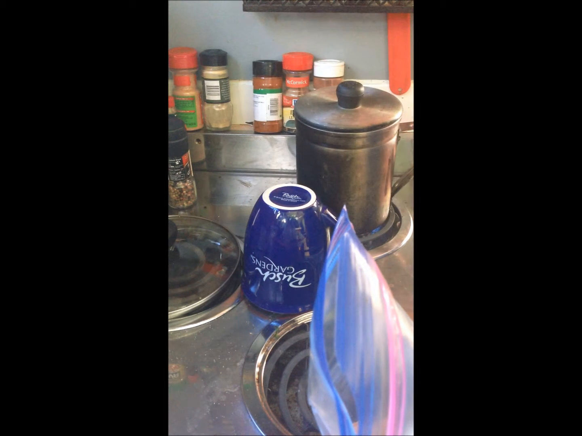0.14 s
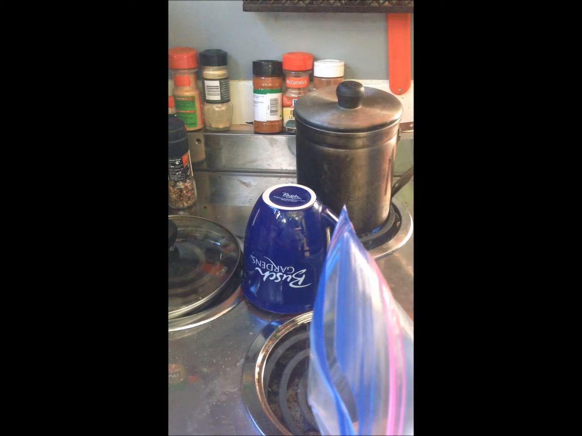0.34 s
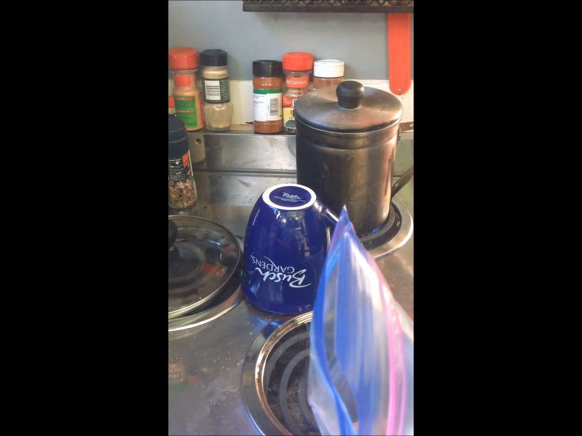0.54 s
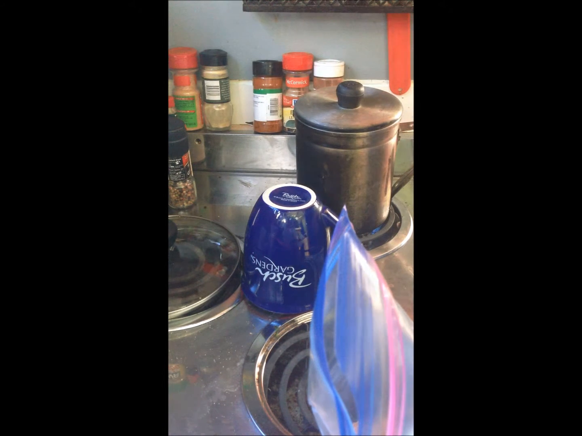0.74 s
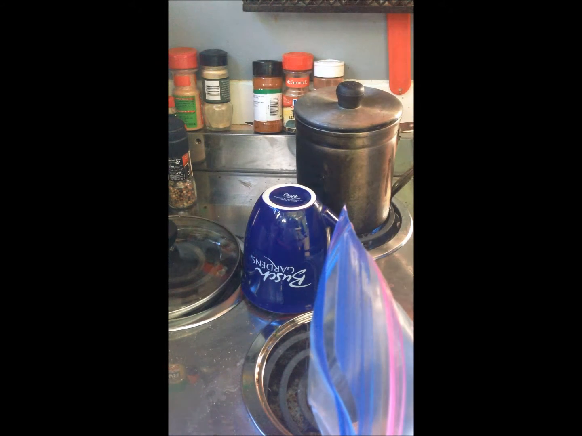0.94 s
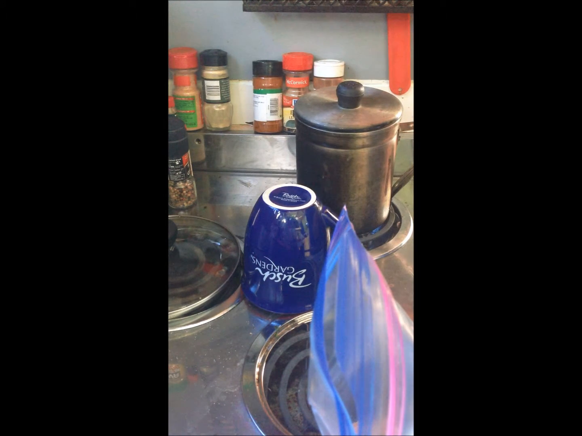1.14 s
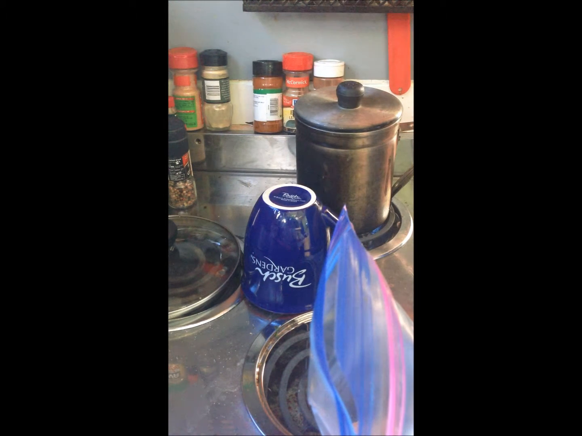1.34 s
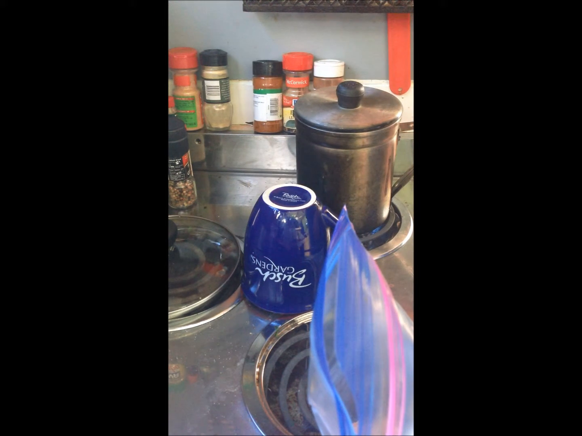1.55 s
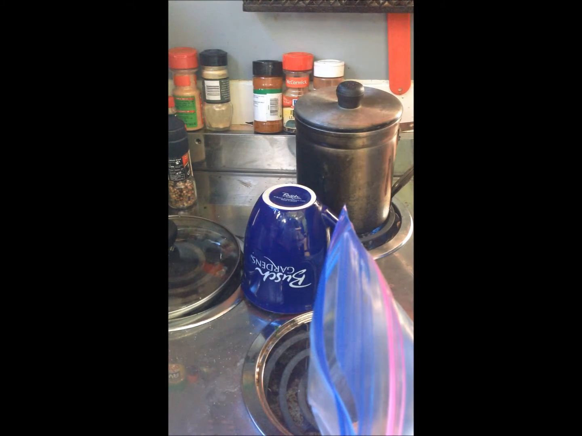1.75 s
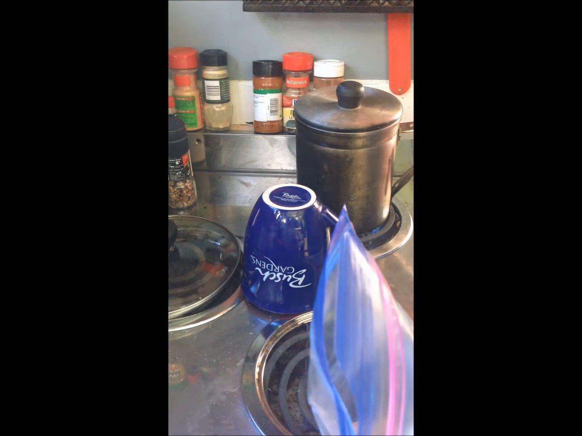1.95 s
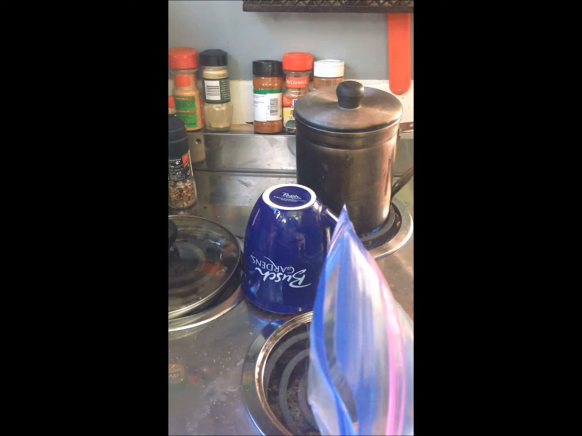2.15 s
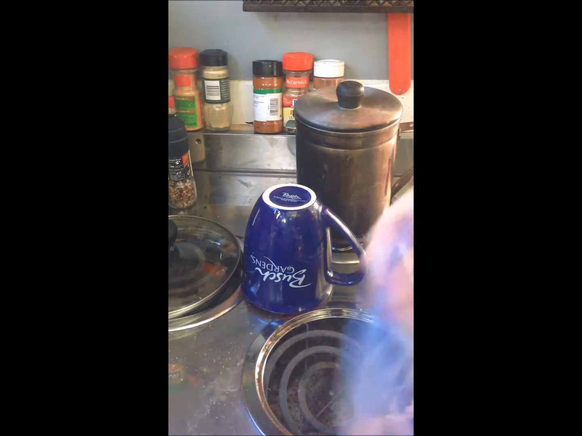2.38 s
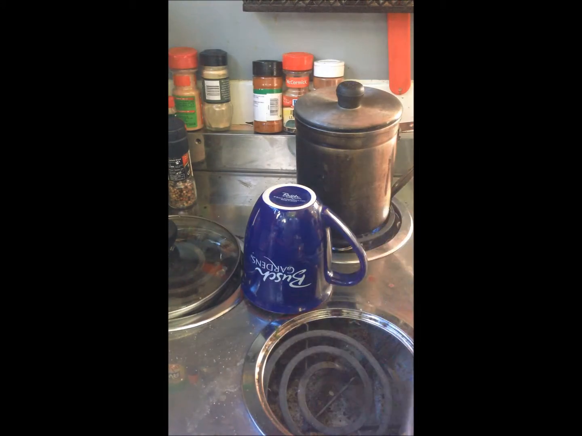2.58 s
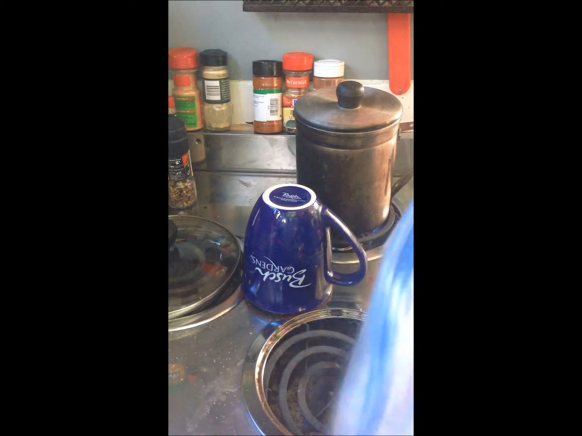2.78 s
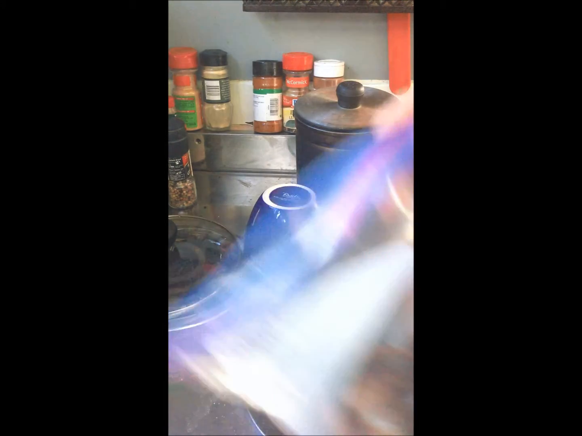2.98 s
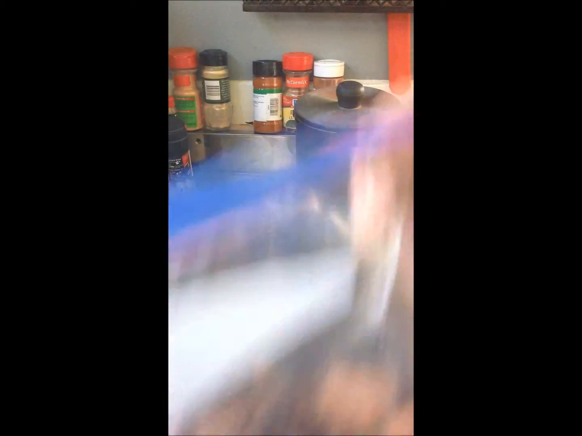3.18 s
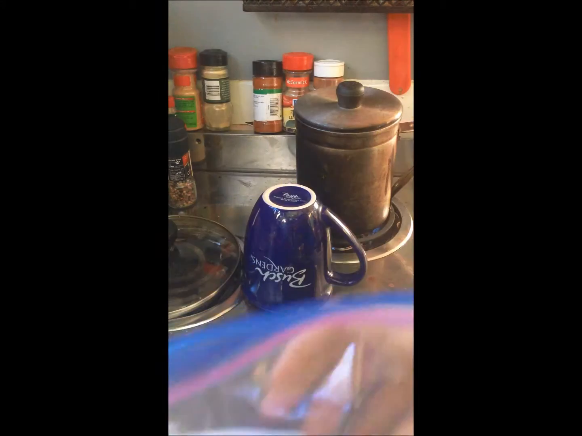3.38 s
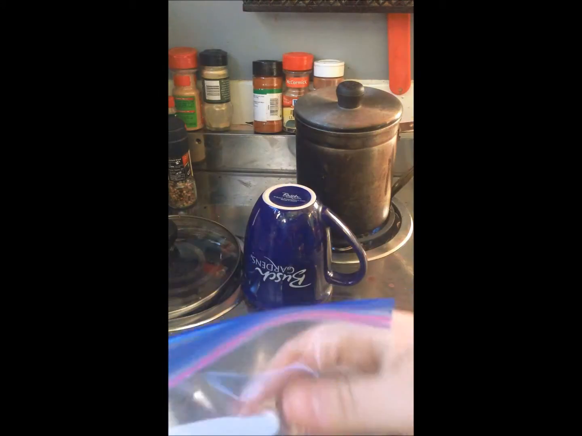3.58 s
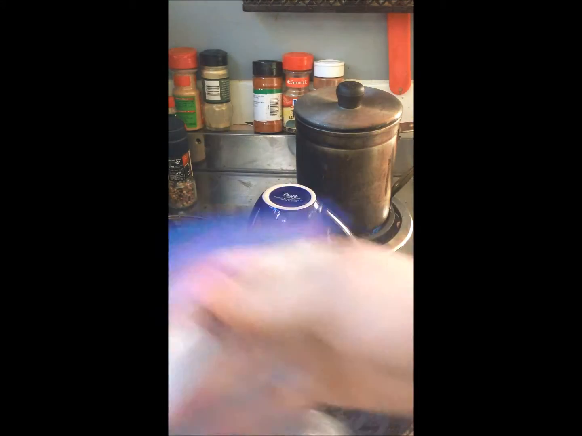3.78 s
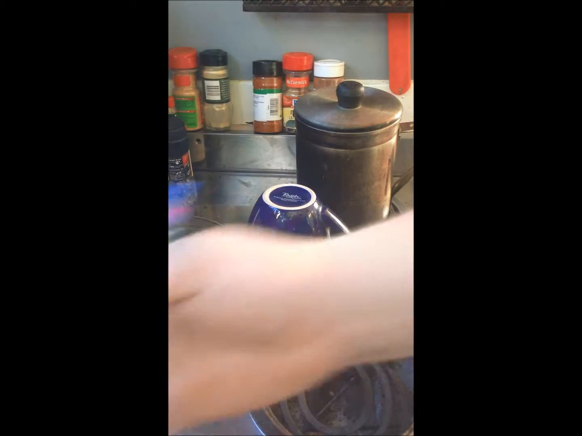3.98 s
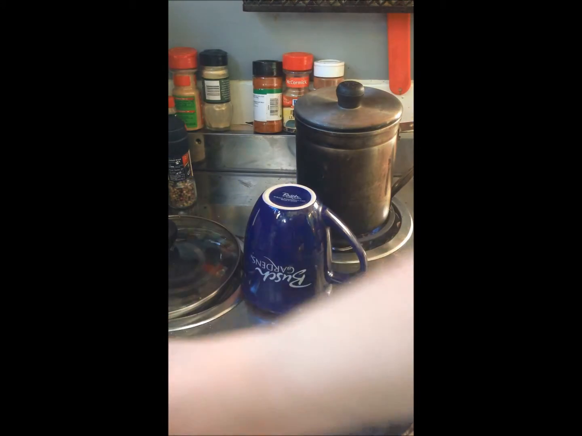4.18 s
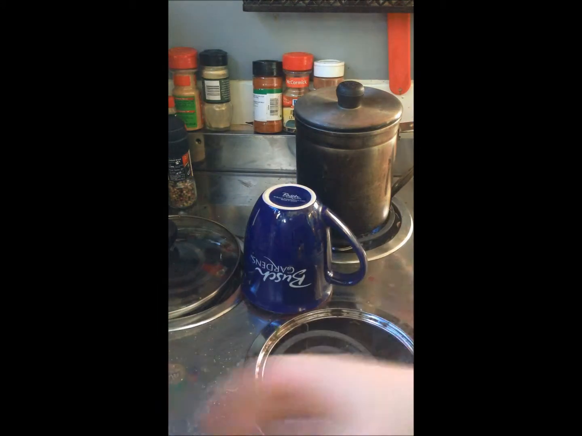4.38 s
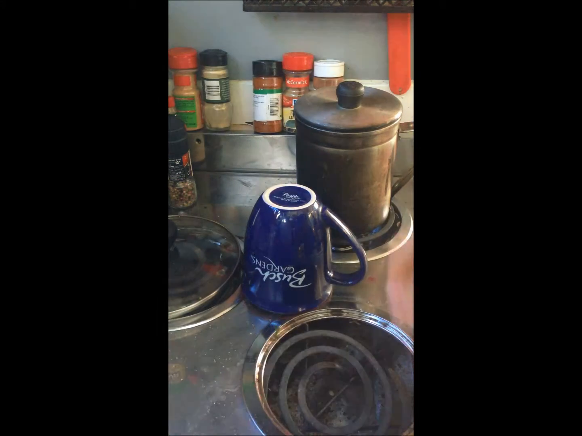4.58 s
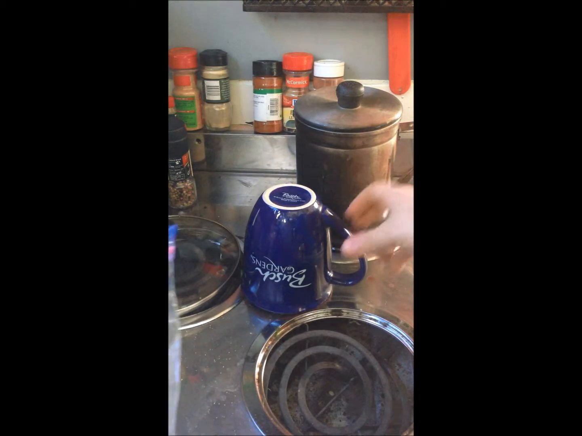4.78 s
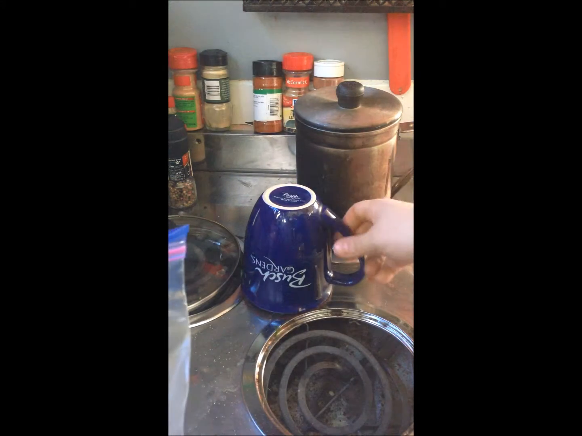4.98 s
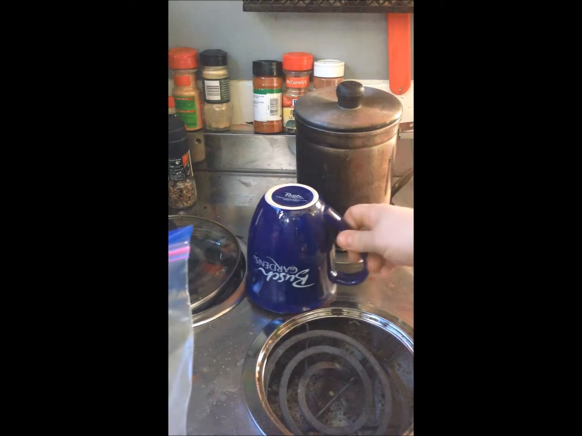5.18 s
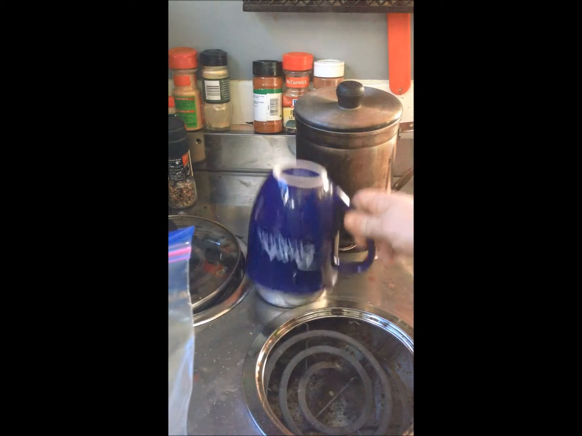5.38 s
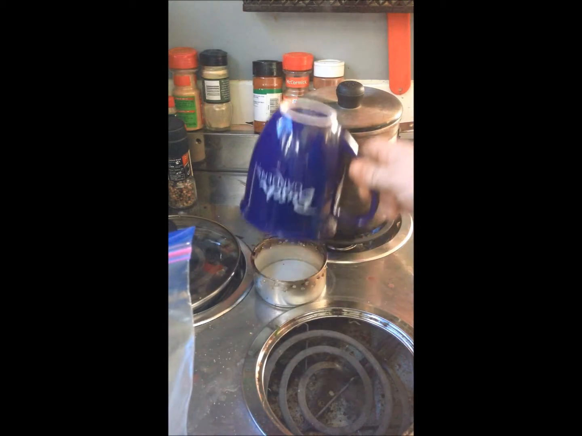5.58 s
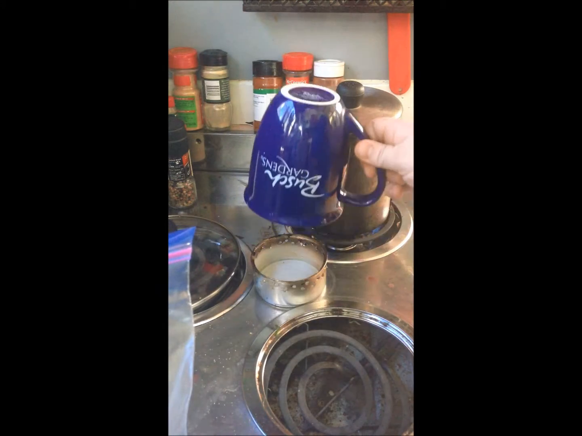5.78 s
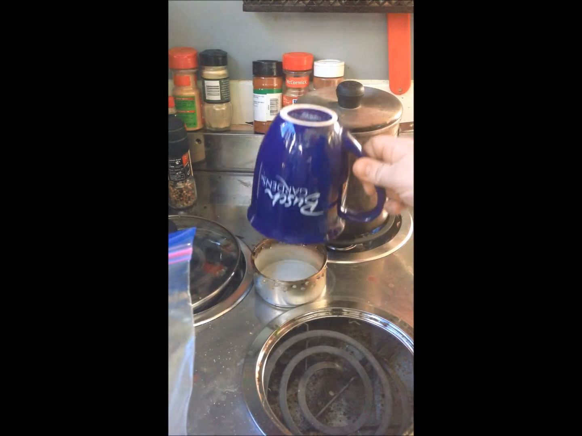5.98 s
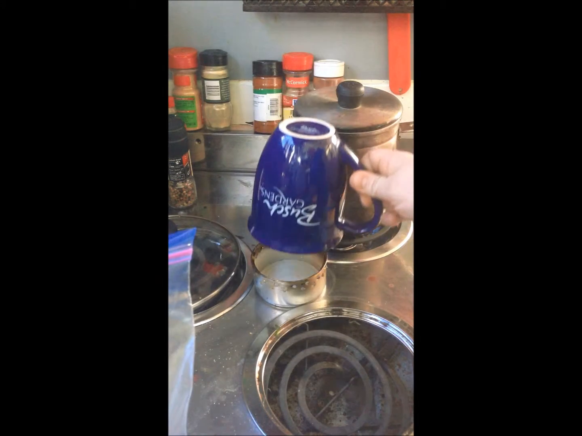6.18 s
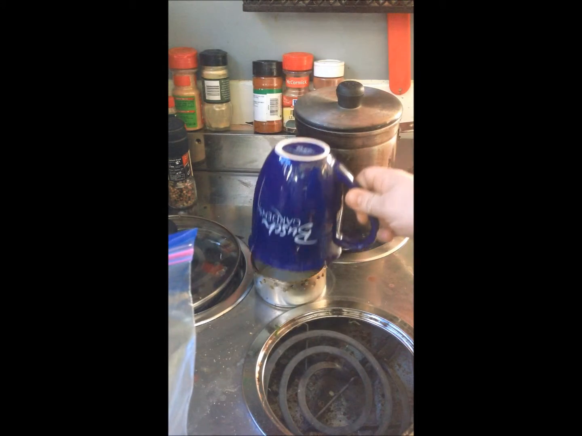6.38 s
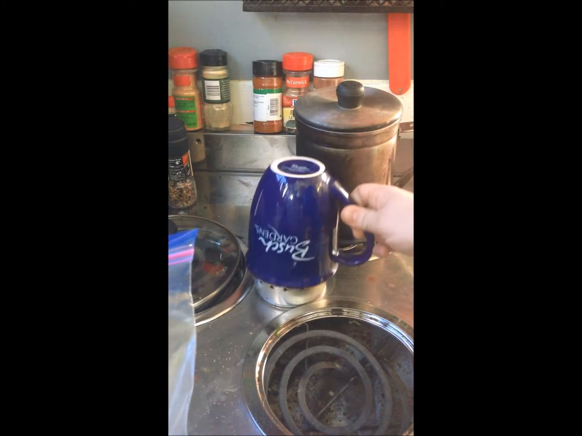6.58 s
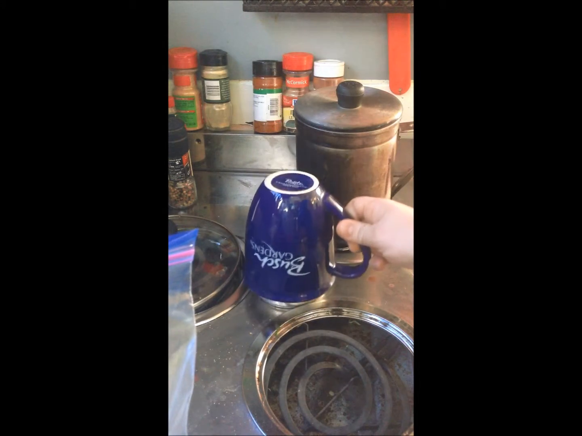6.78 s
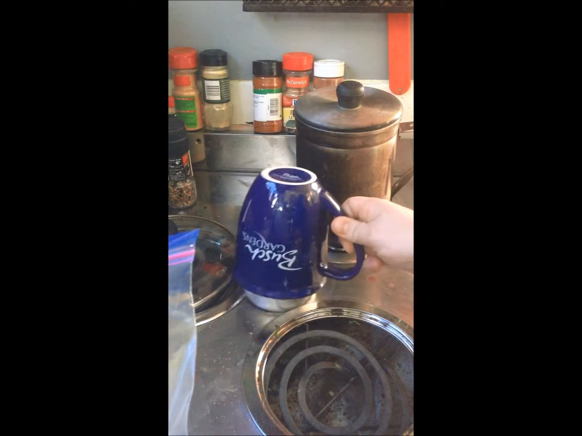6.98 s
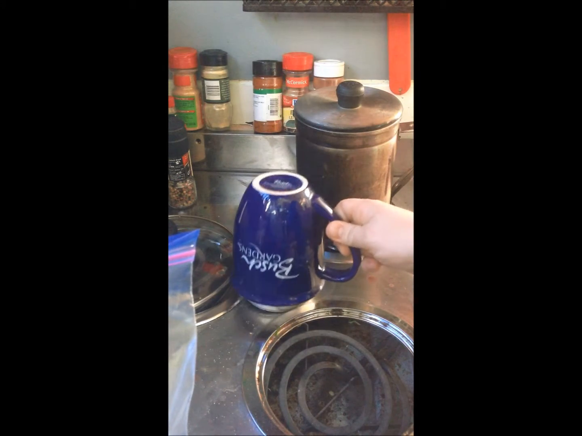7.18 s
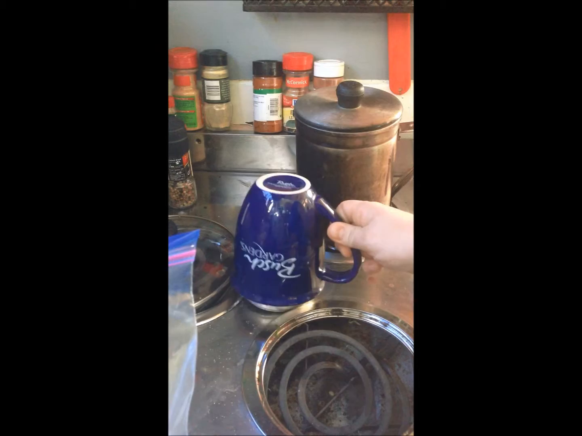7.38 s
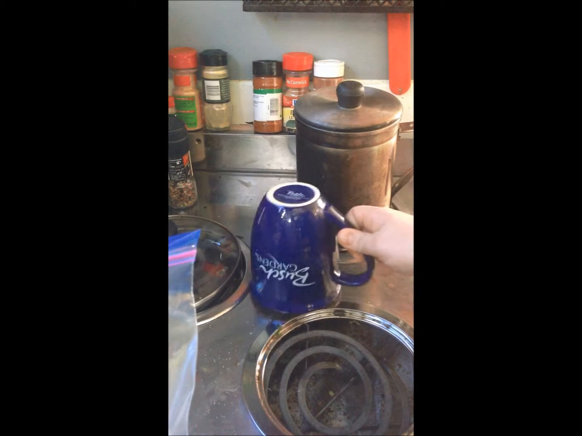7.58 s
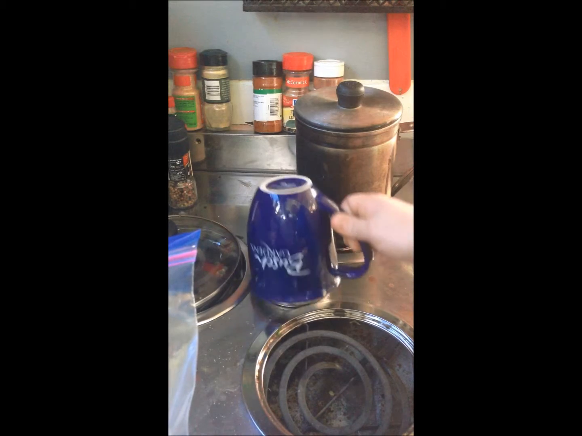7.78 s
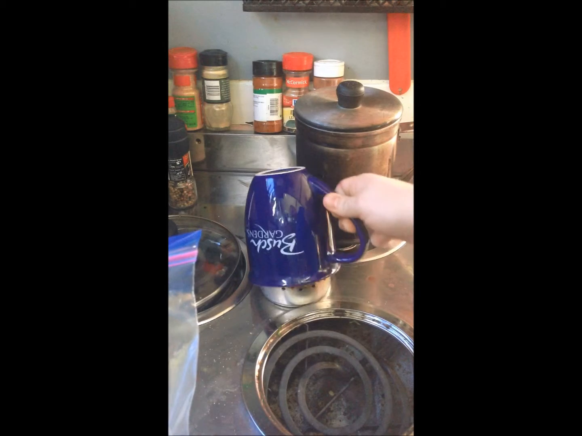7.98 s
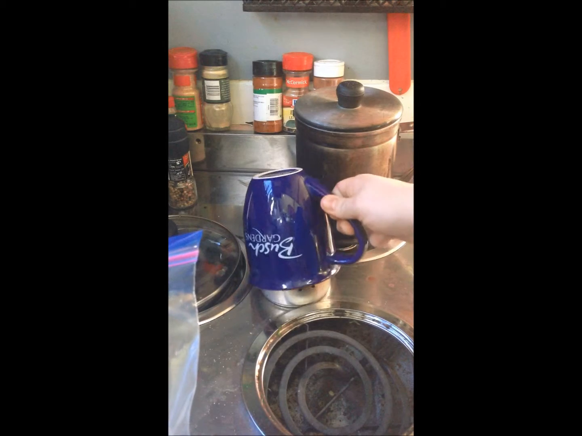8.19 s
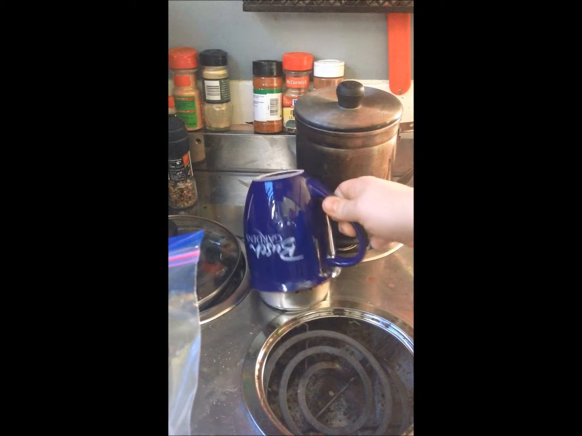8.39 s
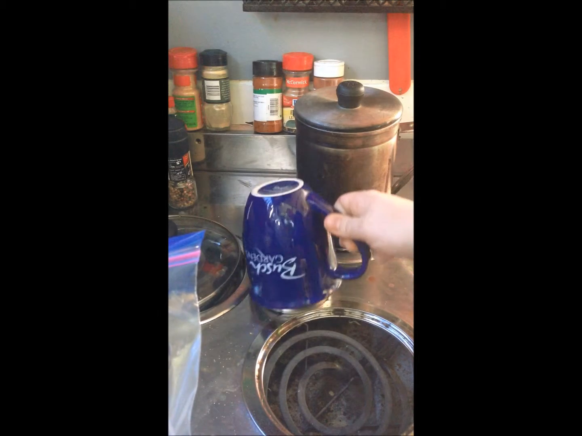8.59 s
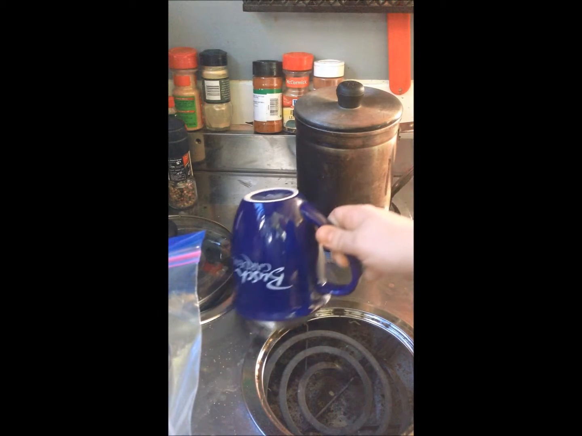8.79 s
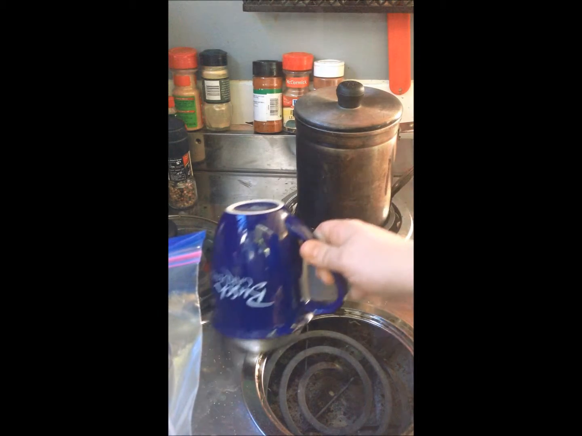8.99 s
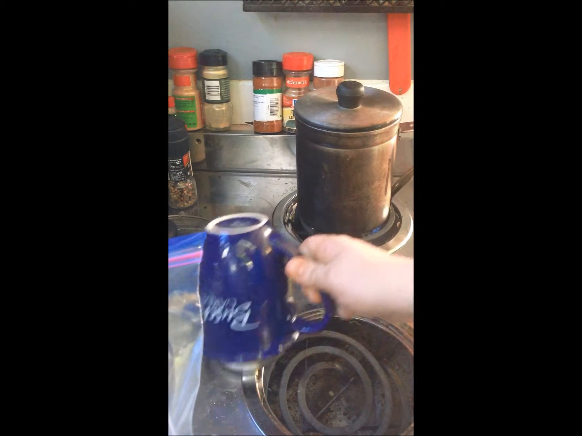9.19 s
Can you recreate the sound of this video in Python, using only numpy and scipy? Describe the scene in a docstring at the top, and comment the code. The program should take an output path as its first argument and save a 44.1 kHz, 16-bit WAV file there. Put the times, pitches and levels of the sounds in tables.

```python
"""A kitchen, at the stove. After three soft, distant knocks, a plastic zip bag is lifted and laid aside,
its film buckling in snaps and puffs. Then an upturned ceramic mug is raised from a small metal cup,
lowered, knocked onto the stove top and nudged about. The sheet metal clacks, the air under the mug rings
hollow, and the glaze squeals briefly on the cup. A faint hiss and a low room tone run throughout."""
import sys
import numpy as np
from scipy import signal
from scipy.fft import rfft, irfft
from scipy.io import wavfile

SR = 44100
rng = np.random.default_rng(int(sys.argv[2]) if len(sys.argv) > 2 else 0)


def unload_audio(sound):
    """Save the sound as a 16-bit wav file, at the path given as the first command line argument."""
    columns = np.transpose(np.atleast_2d(sound))
    # keep every value between -1 and 1, then stretch to whole-number steps
    steps = np.round(np.clip(columns, -1, 1) * 32767)
    wavfile.write(sys.argv[1], SR, steps.astype(np.int16))


N = 407925

# knocks at the stove, three soft, distant ones first, then the mug's hits:
# start_s, clack_db, hardness_db_per_octave, hollow_db, tick_db, contact_s
KNOCK_CUES = [(1.496, -42.5, -2, -66, -49, 0.004), (1.519, -39.5, -5, -51, -46, 0.011),
              (2.137, -45.5, -6, -60, -51, 0.0023), (5.219, -34, -5.5, -31, -40.5, 0.038),
              (5.5142, -18, 1.5, -32.5, -20.5, 0.0097), (6.577, -21.5, -2.4, -23.5, -31, 0.0074),
              (6.824, -42, -4.5, -43, -45.5, 0.015), (6.866, -44.5, -5, -48, -63, 0.0061),
              (6.993, -50, -9, -48, -53, 0.02), (7.2846, -24, -1, -29, -40.5, 0.0035),
              (7.517, -31, -5.5, -37, -38.5, 0.0061), (7.541, -29.5, -6, -23, -34, 0.088),
              (7.5868, -17.5, -4.4, -19, -19, .0068), (7.595, -16.5, -0.8, -24, -18.5, 0.0091),
              (7.627, -34, 1, -38, -33.5, 0.0052), (7.666, -31, -5.5, -28, -45.5, 0.0097),
              (7.739, -43, -7, -44, -50, 0.003), (7.82, -40.5, -6.5, -34, -52, 0.0067),
              (7.969, -42, -3, -37, -56, 0.0063), (8.34, -37.5, -4, -38, -40.5, 0.024),
              (8.382, -42, -6, -43, -53, 0.0093), (8.623, -48.5, -3, -38, -52, 0.011),
              (9.215, -29.5, -3.5, -30.5, -36.5, 0.009)]
# body of a knock, voiced as mug and stove top together: pitch_hz, level_db, base_t60_s
BODY_MODES = [(493, 0, 0.18), (703, -2.5, 0.14), (864, 1, 0.096), (1678, 1.5, 0.086), (2010, 3.5, 0.095),
              (2170, -10, 0.12), (2400, -1, 0.1), (2545, 11.5, 0.023), (3156, 1, 0.056), (3300, -10, 0.043),
              (3700, 3.5, 0.06), (4690, 10.5, 0.056)]
# hollow ring of a knock: air_pitch_ratio, level_db, base_t60_s
HOLLOW_MODES = [(0.802, -3, 0.089), (0.998, 4, 0.13), (1.15, -2, .13)]
# air under the mug, higher as the rim lifts and lower as it closes on the stove: time_s, pitch_hz
AIR_PITCH = [(5.3, 347.6), (5.5, 433.4), (6.58, 499), (6.85, 441), (7.54, 423), (7.6, 367), (7.67, 343),
             (7.97, 430), (8.34, 363), (8.7, 379), (8.95, 403.7), (9.12, 371), (9.22, 405)]
# decay of a knock's chatter: freq_hz, base_t60_s
CHATTER_DECAY = [(100, 0.48), (260, 0.27), (700, 0.19), (1800, 0.17), (5000, 0.11), (13000, 0.088)]
# a knock's low thud, top tick and sheet-metal clack: freq_hz, gain_db
THUD_EQ = [(25, -29), (60, -11.5), (120, -5.5), (260, -2.5), (400, -4)]
KNOCK_TICK_EQ = [(3500, -8.5), (5200, -1.5), (7500, -1.5), (10000, -7.5), (15000, -15)]
PLATE_EQ = [(400, -12.5), (560, 0.5), (900, -2), (1250, 4), (1800, 0.5), (4600, -0.5), (6200, -13)]
# light touches of glaze on metal: start_s, level_db
CLINK_CUES = [(5.212, -29), (5.503, -40), (7.569, -24), (7.576, -27.5)]
# their bright ring: pitch_hz, level_db, t60_s
CLINK_RING = [(4590, 6, 0.029), (4870, -17, 0.01), (7050, -5, .02)]
# the rim rubbing along: start_s, length_s, level_db
RUB_CUES = [(5.249, 0.14, -47), (5.4, 0.073, -46.5), (5.453, .08, -39), (6.939, 0.061, -50),
            (6.987, 0.044, -49), (7.223, 0.063, -49), (8.396, 0.13, -54.5), (8.701, 0.4, -49),
            (8.803, 0.072, -43), (8.888, 0.093, -43.5), (9.101, 0.063, -46.5)]
# grit on a rub: freq_hz, gain_db
GRIT_EQ = [(150, 1.5), (600, 5.5), (1200, -6.5), (2400, -3.5), (12000, -21.5)]
# glaze dragging off the cup: start_s, length_s, level_db
SQUEAL_CUES = [(7.522, .042, -34), (7.564, .02, -34)]
# high modes of the squeal: pitch_hz, level_db
SQUEAL_TONES = [(6720, -9), (8130, -9), (9420, -11), (10950, -8)]

# the bag's film buckling: start_s, snap_db, length_s
BUCKLE_CUES = [(2.4455, -41, 0.0013), (2.462, -37, 0.0064), (2.478, -32, 0.0039), (2.572, -44.5, 0.0012),
               (2.615, -38, 0.0023), (2.819, -34, 0.0034), (2.849, -43.5, 0.0069), (2.985, -44, 0.0037),
               (3.065, -47, 0.0014), (3.317, -35.5, 0.007), (3.327, -30.5, 0.019), (3.3308, -30, 0.0016),
               (3.3482, -22.5, 0.0042), (3.417, -42.5, 0.0011), (3.6661, -46, 0.00076),
               (3.7244, -41.5, 0.00056), (3.809, -39, 0.0039), (3.843, -39.5, 0.0044), (3.866, -41, .007),
               (3.877, -41, 0.0023), (4.081, -46.5, 0.0028), (4.145, -33, 0.011)]
# the film's mid snap, high fizz and low puff: freq_hz, gain_db
SNAP_EQ = [(400, -18), (800, -7), (1400, -6), (2200, 2.5), (3200, -3), (4700, -1), (7000, -30)]
FIZZ_EQ = [(3500, -27.5), (5200, 3.5), (7500, -0.5), (10000, -5), (15000, -16)]
PUFF_EQ = [(30, -20), (90, -7.5), (170, 2.5), (300, -4), (480, -4.5), (850, -1), (1300, -4.5)]
# moves of the hand carrying the bag: crest_s, level_db, half_width_s
HAND_MOVES = [(2.46, -39, 0.062), (2.87, -48.5, 0.11), (3.15, -57, 0.12), (3.62, -51, 0.43),
              (4.17, -43, 0.039), (4.32, -56.5, 0.13)]
# slack film flopping over: start_s, level_db
FLOP_CUES = [(2.412, -42), (2.467, -50), (2.849, -48), (3.101, -51), (3.351, -33.5), (3.484, -51),
             (3.703, -48), (3.746, -40.5), (3.802, -35), (3.869, -39.5), (3.975, -44.5), (4.009, -49.5),
             (4.082, -46), (4.149, -36)]
# fine, thin ticks, from film creases and grit under the sliding rim: start_s, peak_db
FINE_TICK_CUES = [(0.0972, -29), (0.168, -20.5), (0.3616, -30.5), (1.039, -27.5), (1.3109, -29),
                  (1.6157, -25.5), (1.7818, -33), (2.4458, -20), (2.615, -21), (3.7238, -27), (5.4106, -32),
                  (5.4655, -30), (5.7404, -32), (6.5006, -37), (7.3693, -31)]
# their tone: freq_hz, gain_db
FINE_TICK_EQ = [(6000, -4), (8500, -5), (15000, -7)]

# fader ride on the hiss's airy top: time_s, level_db
HISS_RIDE = [(0.0, -47.5), (2.55, -48.5), (3.19, -53.5), (3.68, -50), (3.89, -52), (8.27, -56.5),
             (9.25, -46.5)]
# body and airy top of the hiss: freq_hz, gain_db
HISS_BODY_EQ = [(500, -24), (950, -15), (1350, -4), (2000, -3), (2500, -0.5), (2900, -4), (3600, -0.5),
                (4700, -1), (6500, -30)]
HISS_TOP_EQ = [(3000, -15), (5300, 2), (6800, 0.5), (8500, 0.5), (11000, -4.5), (15000, -7)]
# resonances colouring the hiss: centre_hz, width_hz, gain_db
HISS_RESONANCES = [(1685, 100, 6), (2410, 240, 5.5), (3680, 190, 2), (4660, 400, 2), (6500, 300, 3.5)]
# breathy whistle in the hiss: pitch_hz, width_hz, level_db
WHISTLE_BANDS = [(715, 70, -18.5), (1358, 170, -2), (1650, 100, -0.5), (2390, 240, -11), (3830, 410, -4),
                 (4650, 330, 1), (5590, 150, 2), (6570, 600, -12), (8070, 610, -1)]
# low room tone: freq_hz, gain_db
ROOM_EQ = [(30, -21), (70, -3.5), (125, -11), (170, -10), (350, -11), (600, -10.5), (1200, -12)]
# faint drones that come and go: start_s, end_s, pitch_hz, width_hz, level_db
DRONE_CUES = [(0, 1.6, 54, 12, -67), (5.5, 6.55, 605, 50, -65), (5, 5.25, 355, 60, -64)]
# the kitchen's reverb: freq_hz, t60_s
ROOM_DECAY = [(100, 0.94), (400, 0.77), (1500, 0.16), (4000, 0.19), (12000, 0.59)]

CONTACT_S, RING_SCALE, RING_GROWTH = 0.0096, 0.83, 0.29  # firm, brief contact damps; loose contact rings
THUD_DB, THUD_PER_HARDNESS = -13.5, -2  # against the clack; soft blows thud more
FADE_SHARE = 0.65  # share of a rub or squeal spent swelling and dying
FOLD_S = 0.0043  # a middling fold; longer ones push more air and fizz less
PUFF_DB, PUFF_DB_PER_DOUBLING = -6, 3  # against the snap
FIZZ_DB, FIZZ_DB_PER_DOUBLING = -5.5, -1.5
FLOP_RISE_S, FLOP_CUTOFF_HZ = 0.0057, 348
HISS_USUAL_DB = -51  # body and whistle follow the ride's swings about this level
BODY_DB, BODY_FOLLOWS = -52, 0.21
WHISTLE_DB, WHISTLE_FOLLOWS = -59, 1.2
LOWPASS_HZ = 15600


def knocks():
    """Three soft, distant knocks, then the mug's hits: each chatters on contact, then rings out."""
    out, t = np.zeros(N), np.arange(SR // 2) / SR
    mode_peaks = [(hz, 65, 8.5) for hz, _, _ in BODY_MODES]  # the chatter gathers at the modes
    sheet_eq = lambda hz: band(PLATE_EQ)(hz) + bells(hz, mode_peaks)
    for start, clack_db, hardness, hollow_db, tick_db, contact in KNOCK_CUES:
        stretch = RING_SCALE * (contact / CONTACT_S) ** RING_GROWTH
        attack = np.minimum(t / (0.17 * contact), 1)
        swell = np.minimum(t / (0.64 * contact), 1)  # low modes take longer to build up
        decay = [(hz, t60 * stretch) for hz, t60 in CHATTER_DECAY]
        chatter = attack * dying_noise(t, decay, hold_s=contact)
        # each point of contact favours other modes
        modes = [(hz, db + 3 * rng.normal(), t60 * stretch) for hz, db, t60 in BODY_MODES]
        body = attack * ring(t, modes, hold_s=contact / 2)
        air_modes = [(ratio * air_pitch(start), db, t60 * stretch) for ratio, db, t60 in HOLLOW_MODES]
        hollow = swell * ring(t, air_modes, hold_s=contact)
        clack = unit(eq(chatter, sheet_eq)) + amp(-2.5) * unit(body)
        # harder blows are brighter
        clack = eq(clack, lambda hz: hardness * np.log2(np.clip(hz, 500, 5000) / 1500))
        thud = burst(eq(chatter, band(THUD_EQ)), clack_db + THUD_DB + THUD_PER_HARDNESS * hardness)
        tick = burst(eq(chatter, band(KNOCK_TICK_EQ)), tick_db)
        add(out, start, burst(clack, clack_db) + burst(hollow, hollow_db) + thud + tick)
    return out


def glaze_clinks():
    """Glaze touches metal with a short, bright ring."""
    out, t = np.zeros(N), np.arange(SR // 2) / SR
    attack = np.minimum(t / 0.00043, 1)
    for start, db in CLINK_CUES:
        add(out, start, amp(db) * attack * ring(t, CLINK_RING))
    return out


def rim_rubs():
    """The rubbing rim keeps the air under the mug humming, with a little grit on top."""
    out = np.zeros(N)
    for start, length, db in RUB_CUES:
        t = np.arange(start, start + length, 1 / SR)
        hum = signal.hilbert(narrow_noise(air_pitch(t), width_hz=81, size=len(t)))
        hum = unit(hum.real / (abs(hum) + 2.9))  # steady rubbing evens out the swells
        grit = unit(eq(rng.standard_normal(len(t)), band(GRIT_EQ)))
        add(out, start, amp(db) * (hum + amp(-5) * grit) * signal.windows.tukey(len(t), FADE_SHARE))
    return out


def air_pitch(time_s):
    """Resonance of the air under the mug, in Hz."""
    return np.interp(time_s, *np.transpose(AIR_PITCH))


def glaze_squeals():
    """Stick and slip of the glaze on the cup's edge drives a few high modes."""
    out = np.zeros(N)
    for start, length, db in SQUEAL_CUES:
        size = round(length * SR)
        tones = sum(amp(level) * narrow_noise(hz, width_hz=260, size=size) for hz, level in SQUEAL_TONES)
        add(out, start, amp(db) * unit(tones) * signal.windows.tukey(size, FADE_SHARE))
    return out


def bag_buckles():
    """Each buckle of the film is a cluster of tiny snaps and a low puff of air."""
    out, t = np.zeros(N), np.arange(SR // 5) / SR
    for start, db, length in BUCKLE_CUES:
        cluster = crackle(t, length)
        doublings = np.log2(length / FOLD_S)
        crack = early_echoes(cluster, wet_db=-2, t60=0.096)
        push = early_echoes(cluster, wet_db=-3.5, t60=0.14)
        fold_hz = 2000 * 2 ** rng.normal()  # each fold has its own pitch
        fold_eq = lambda hz: band(SNAP_EQ)(hz) + bells(hz, [(fold_hz, fold_hz / 2, 5)])
        snap = burst(eq(crack, fold_eq), db)
        fizz = burst(eq(crack, band(FIZZ_EQ)), db + FIZZ_DB + FIZZ_DB_PER_DOUBLING * doublings)
        puff = burst(eq(push, band(PUFF_EQ)), db + PUFF_DB + PUFF_DB_PER_DOUBLING * doublings)
        add(out, start, snap + fizz + puff)
    return out


def bag_flops():
    """Slack film flops over with a low, rounded bump."""
    out, t = np.zeros(N), np.arange(SR // 5) / SR
    for start, db in FLOP_CUES:
        push = rng.standard_normal(len(t)) * t * np.exp(-(t / FLOP_RISE_S) ** 2 / 2)
        bump = eq(early_echoes(push, wet_db=-11, t60=0.18), slack_eq)
        add(out, start, burst(bump, db))
    return out


def bag_crinkle(ticks_per_s=300, pops_per_s=22):
    """Small creases tick and slack film pops softly, swelling with each move of the hand."""
    t = np.arange(N) / SR
    swell = sum(amp(db) * np.exp(-((t - crest) / width) ** 2) for crest, db, width in HAND_MOVES)
    ticks = (rng.random(N) < ticks_per_s / SR) * rng.choice([-1, 1], N)
    ticks = early_echoes(ticks * uneven_gains(N, spread_db=6.3, cap=2.5), wet_db=2, t60=0.064)
    pops = (rng.random(N) < pops_per_s / SR) * rng.uniform(0.3, 1, N)
    pops = early_echoes(pops, wet_db=3.5, t60=0.16)
    snap = amp(-1) * unit(eq(ticks, band(SNAP_EQ)))
    fizz = amp(-7) * unit(eq(ticks, band(FIZZ_EQ)))
    flutter = amp(-2) * unit(eq(pops, slack_eq))
    return swell * (snap + fizz + flutter)


def slack_eq(hz):
    """Tone of slack film in dB: a puff with its top rolled off."""
    return band(PUFF_EQ)(hz) - 10 * np.log10(1 + (hz / FLOP_CUTOFF_HZ) ** 4)


def fine_ticks():
    """Fine, thin ticks: film creases let go, and grit catches under the sliding rim."""
    out, t = np.zeros(N), np.arange(SR // 10) / SR
    for start, peak_db in FINE_TICK_CUES:
        crack = early_echoes(crackle(t, length_s=0.00088), wet_db=2, t60=0.09)
        tick = eq(crack, band(FINE_TICK_EQ))
        add(out, start, amp(peak_db) * tick / abs(tick).max())
    return out


def crackle(t, length_s):
    """A cluster of tiny snaps of very uneven size."""
    snaps = rng.standard_normal(len(t)) * uneven_gains(len(t), spread_db=8.9, cap=4)
    attack = np.minimum(t / (0.5 * length_s), 1)
    return snaps * attack * np.exp(-(t / (1.4 * length_s)) ** 2)


def hiss():
    """A fine, grainy hiss with steady resonances; as it weakens, its whistle fades most, its body least."""
    top_db = np.interp(np.arange(N) / SR, *np.transpose(HISS_RIDE))
    swing_db = top_db - HISS_USUAL_DB
    body_db = BODY_DB + BODY_FOLLOWS * swing_db
    whistle = unit(sum(amp(db) * narrow_noise(hz, width, N) for hz, width, db in WHISTLE_BANDS))
    out = amp(WHISTLE_DB + WHISTLE_FOLLOWS * swing_db) * whistle
    for shape, level_db in ((HISS_BODY_EQ, body_db), (HISS_TOP_EQ, top_db)):
        grain = rng.standard_normal(N) * uneven_gains(N, spread_db=2.9, cap=6)
        grain = early_echoes(grain, wet_db=-9, t60=0.06)
        out += amp(level_db) * unit(eq(grain, lambda hz: band(shape)(hz) + bells(hz, HISS_RESONANCES)))
    return out


def room_tone():
    """A bed of low room noise, mains hum and a few faint drones."""
    t = np.arange(N) / SR
    out = amp(-62.5) * unit(eq(rng.standard_normal(N), band(ROOM_EQ)))
    out += amp(-66) * np.sin(2 * np.pi * 120 * t)
    for start, end, hz, width, db in DRONE_CUES:
        fade = np.clip(np.minimum(t - start, end - t) / 0.024, 0, 1)
        out += amp(db) * fade * narrow_noise(hz, width, N)
    return out


def early_echoes(x, wet_db, t60):
    """Adds dense reflections from the stove top, its back panel and the pots."""
    t = np.arange(SR // 10) / SR
    echoes = rng.standard_normal(len(t)) * amp(-60 * t / t60) * (t > 0.001)
    return x + amp(wet_db) * signal.oaconvolve(x, echoes / np.linalg.norm(echoes))[:len(x)]


def reverb(x):
    """The long tail of the kitchen, wet only."""
    t = np.arange(SR) / SR
    tail = dying_noise(t, ROOM_DECAY) * np.minimum(t / 0.0067, 1)
    return signal.oaconvolve(x, tail / np.linalg.norm(tail))[:N]


def ring(t, modes, hold_s=0):
    """Modes that hold, then die away, each at a random phase."""
    decay_s = np.maximum(t - hold_s, 0)
    return sum(amp(db - 60 * decay_s / t60) * np.sin(2 * np.pi * (hz * t + rng.random()))
               for hz, db, t60 in modes)


def dying_noise(t, t60_curve, hold_s=0):
    """Noise that holds, then dies in each band at its own speed."""
    centres = np.geomspace(80, 14000, 8)
    hz = np.fft.rfftfreq(len(t), 1 / SR)
    spectrum = rfft(rng.standard_normal(len(t)))
    decay_s = np.maximum(t - hold_s, 0)
    out = np.zeros(len(t))
    for centre, share in zip(centres, np.eye(len(centres))):
        noise = irfft(spectrum * curve_at(np.c_[centres, share], hz), len(t))
        out += noise * amp(-60 * decay_s / curve_at(t60_curve, centre))
    return out


def narrow_noise(hz, width_hz, size):
    """Noise through a steep resonance that may glide."""
    pole = np.exp(-np.pi * width_hz / SR)
    noise = rng.standard_normal(size) + 1j * rng.standard_normal(size)
    wander = signal.lfilter([1], [1, -2 * pole, pole * pole], noise)
    carrier = np.exp(2j * np.pi * np.cumsum(hz * np.ones(size)) / SR)
    return unit((wander * carrier).real)


def uneven_gains(size, spread_db, cap):
    """Random boosts, mostly small, up to cap times spread_db."""
    return amp(spread_db * np.minimum(rng.exponential(1, size), cap))


def eq(x, curve_db):
    """Minimum-phase EQ with the gain curve_db(hz)."""
    size = 4096
    hz = abs(np.fft.fftfreq(size, 1 / SR))
    log_gain = np.log(amp(np.maximum(curve_db(hz), -90)))
    taps = np.fft.ifft(np.exp(np.conj(signal.hilbert(log_gain)))).real
    return signal.oaconvolve(x, taps[:size // 2])[:len(x)]


def band(points):
    """An EQ curve in dB that falls 30 dB per octave past its ends."""
    low, high = points[0][0], points[-1][0]
    return lambda hz: curve_at(points, hz) - 30 * abs(np.log2((hz + 1) / (np.clip(hz, low, high) + 1)))


def bells(hz, peaks):
    """Gain in dB of a few bell-shaped resonances."""
    return sum(db / (1 + (2 * (hz - centre) / width) ** 2) for centre, width, db in peaks)


def curve_at(points, hz):
    """Reads a table along a log-frequency axis."""
    freqs, values = np.transpose(points)
    return np.interp(np.log(hz + 1), np.log(freqs + 1), values)


def amp(db):
    """Decibels to gain."""
    return 10 ** (np.asarray(db) / 20)


def unit(x):
    """Scales to rms 1."""
    return x / np.sqrt(np.mean(x ** 2) + 1e-20)


def burst(x, db):
    """Gives a short sound the energy of 20 ms at this level."""
    return amp(db) * x / np.sqrt(np.sum(x ** 2) / (0.02 * SR) + 1e-20)


def add(mix, start_s, sound):
    """Drops a sound into the mix at its cue."""
    part = mix[max(round(start_s * SR), 0):][:len(sound)]
    part += sound[:len(part)]


def scene():
    """Knocks, bag and mug with a touch of reverb, over hiss and room tone; the same in both ears."""
    foley = bag_buckles() + bag_flops() + fine_ticks() + bag_crinkle()
    foley += knocks() + glaze_clinks() + rim_rubs() + glaze_squeals()
    mono = foley + amp(-25.5) * reverb(foley) + hiss() + room_tone()
    return np.array([mono, mono])


def record(dry):
    """Clips at full scale, then cuts the very top with a steep low-pass."""
    lowpass = signal.firwin(511, LOWPASS_HZ, window=("kaiser", 9), fs=SR)
    return signal.oaconvolve(np.clip(dry, -1, 1), lowpass[None], "same", axes=1)


dry = scene()
out = record(dry)
unload_audio(out)
```